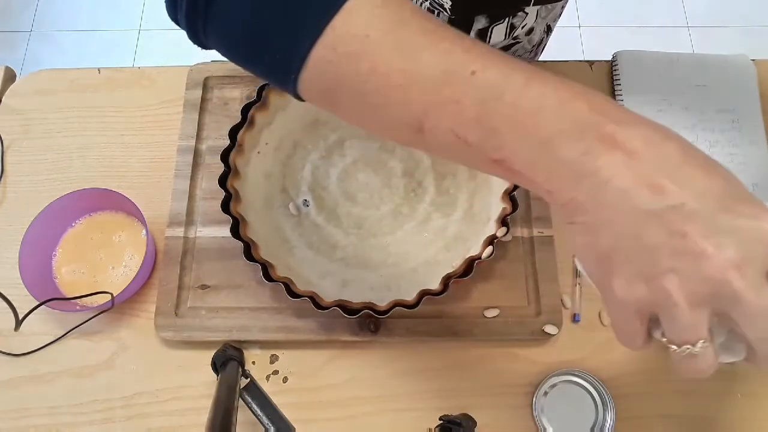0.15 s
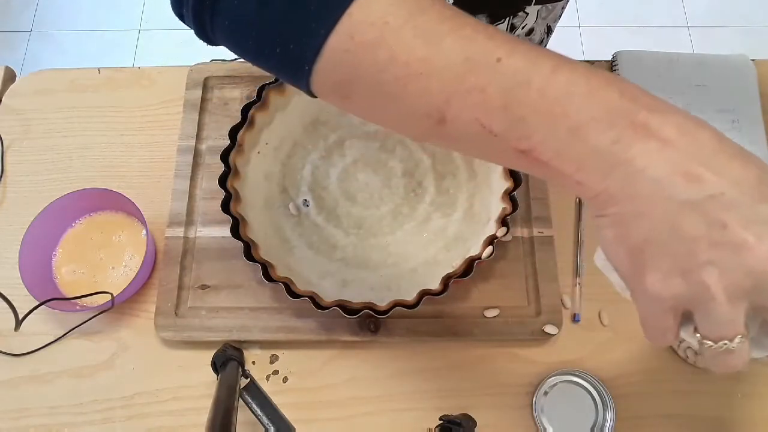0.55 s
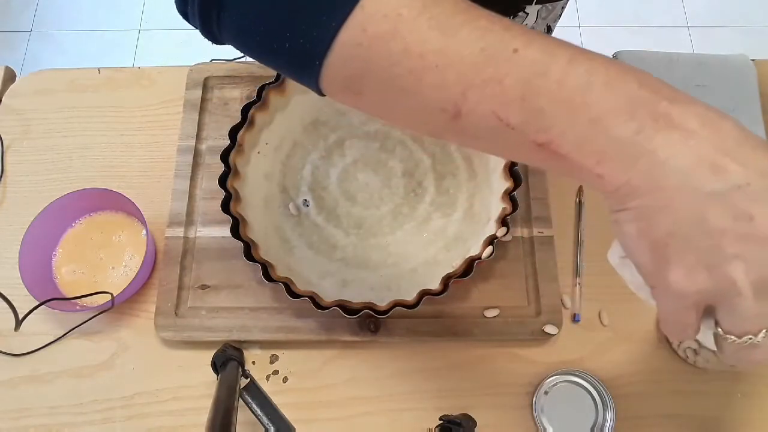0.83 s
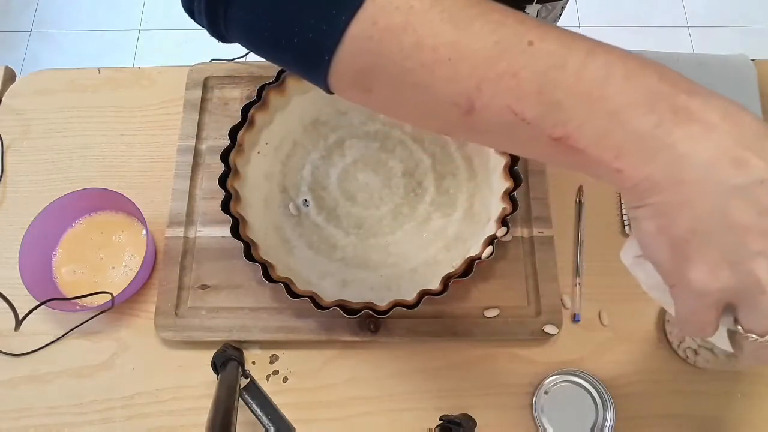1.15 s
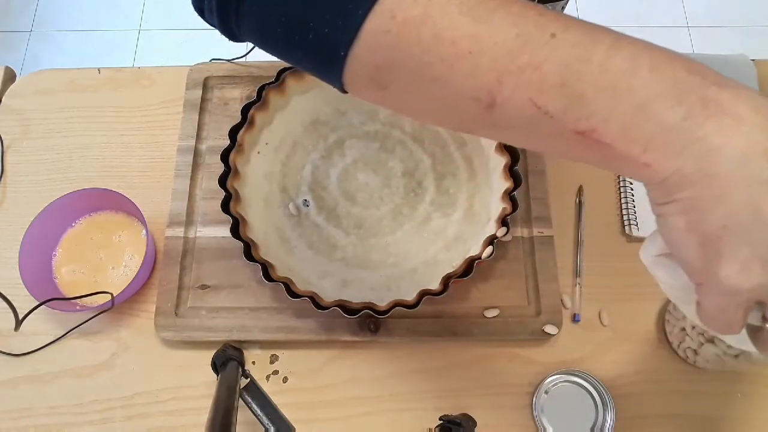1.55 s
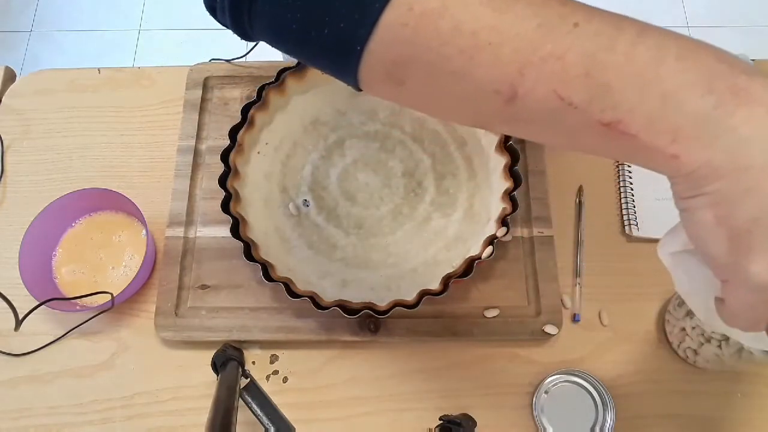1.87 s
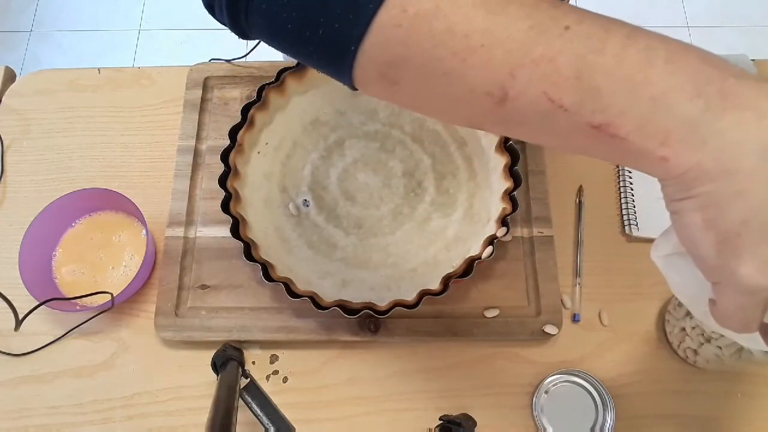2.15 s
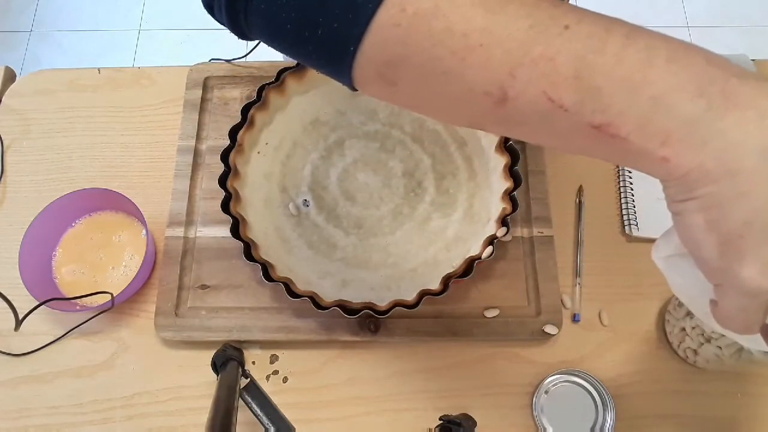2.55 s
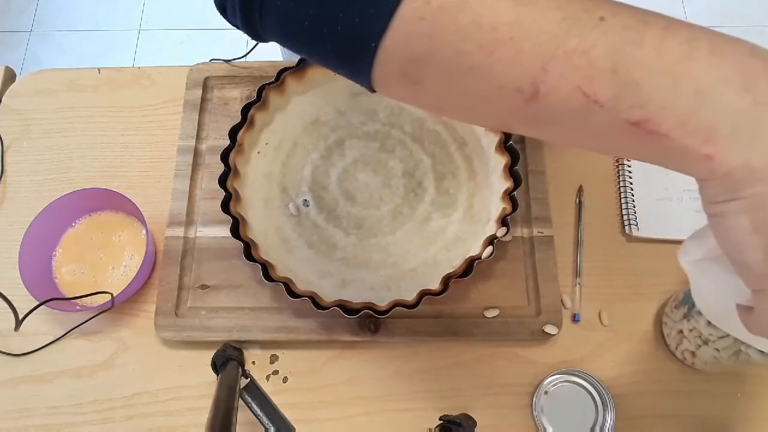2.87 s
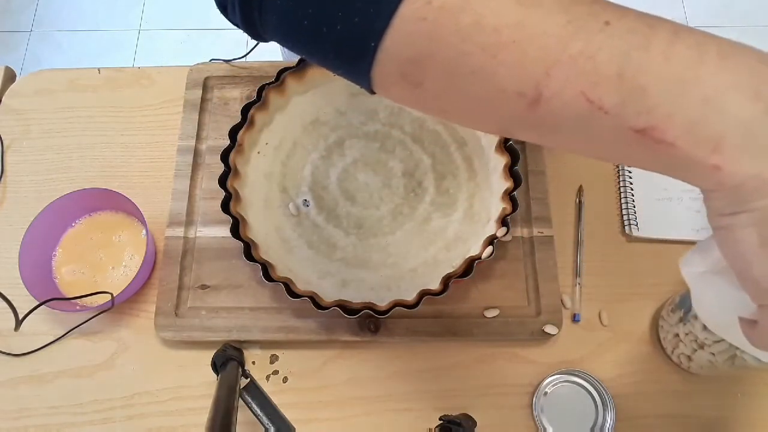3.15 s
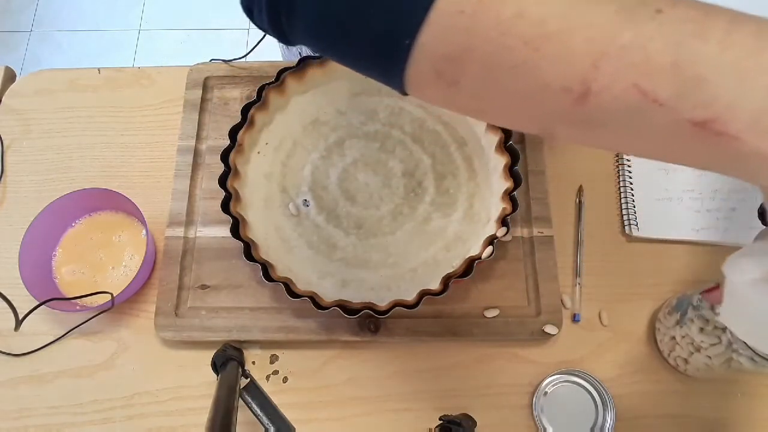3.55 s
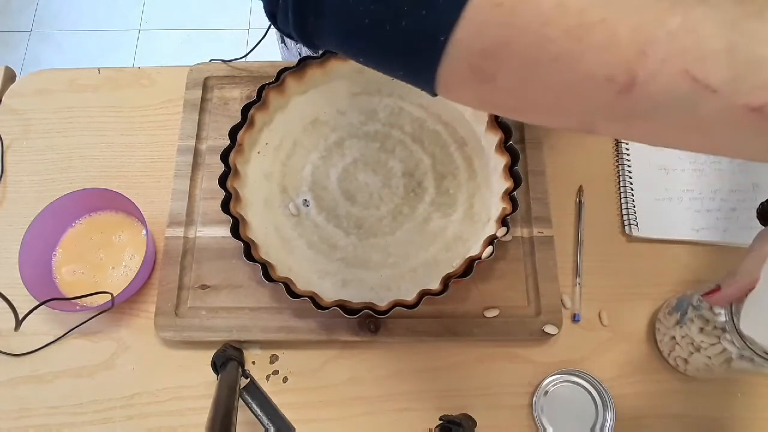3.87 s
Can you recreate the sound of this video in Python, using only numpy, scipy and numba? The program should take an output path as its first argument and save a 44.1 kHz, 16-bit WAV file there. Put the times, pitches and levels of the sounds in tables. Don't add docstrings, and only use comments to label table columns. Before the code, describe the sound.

The sound begins mid-pour: a dense stream of dried beans hits the inside of a glass jar, bright and ringing, with a hollow air boom beneath. Single beans chink clearly at about 0.2, 0.65, 1.45 and 1.7 s. The flow dips briefly near 0.5 and 1.0 s. From about 0.7 s beans clatter drily on a growing heap; the glass ring shortens and dulls while the air tone rises and strengthens. The stream thins and ends at 2.1-2.4 s. Baking paper is shaken with sharp snaps, strongest around 2.1, 2.35 and 2.55 s, sparser to 3.2 s. Dull jar-on-table knocks come from 1.7 s, notably near 2.95 and 3.85 s. A few beans tick at 3.1 and 3.3-3.45 s. From 3.5 to 4 s the paper rubs, crackles and creases. Hard kitchen walls add a short, lively reverberation over faint steady room hush; close microphone.

```python
import sys
import numpy as np
from scipy import signal
from scipy.fft import rfft, irfft, next_fast_len
from scipy.io import wavfile
from scipy.ndimage import uniform_filter1d
from numba import njit

SR = 44100
rng = np.random.default_rng(int(sys.argv[2]) if len(sys.argv) > 2 else 0)


def volts_from_db(level):
    exponent = np.asarray(level, float) / 20
    return 10 ** exponent


def to_wav(s):
    ch = np.atleast_2d(s).T
    pcm = np.round(np.clip(ch, -1, 1) * 32767)
    wavfile.write(sys.argv[1], SR, pcm.astype(np.int16))


N = 176796
T = np.arange(N) / SR


def rms_one(x):
    return x / np.sqrt(np.mean(x ** 2) + 1e-20)


def in_time(rows):
    s, *columns = np.transpose(rows)
    times = [s[0] - .05, *s, s[-1] + .05]
    return [np.interp(T, times, [-90, *c, -90]) for c in columns]


def at_hz(points, hz):
    points = np.array(points)
    return np.interp(np.log(hz), np.log(points[:, 0]), points[:, 1])


def colour(x, spectrum):
    log_gain = np.log(volts_from_db(at_hz(spectrum, np.linspace(1, SR / 2, 4097))))
    folded = irfft(log_gain) * np.r_[1, np.full(4095, 2.), 1, np.zeros(4095)]
    impulse = irfft(np.exp(rfft(folded)))
    return rms_one(signal.fftconvolve(x, impulse)[:N])


def band(x, low_hz, high_hz):
    return signal.sosfilt(signal.butter(2, [low_hz, high_hz], "band", fs=SR, output="sos"), x)


def grains(per_s, spread_db, clump_db):
    drift = uniform_filter1d(rng.standard_normal(N), size=500)
    clumps = rms_one(uniform_filter1d(drift, size=500))
    sizes = volts_from_db(spread_db * np.minimum(rng.exponential(1, N), 4)) * rng.choice([-1, 1], N)
    return sizes * (rng.random(N) < per_s * volts_from_db(clump_db * clumps) / SR)


@njit
def ring(clicks, pole, turn):
    out = np.zeros(len(clicks))
    for i in range(2, len(clicks)):
        fed_back = pole[i] * (2 * np.cos(turn[i]) * out[i - 1] - pole[i] * out[i - 2])
        out[i] = np.sin(turn[i]) * clicks[i] + fed_back
    return out


def mode(clicks, hz, width_hz):
    out, end = np.zeros(N), 110000
    struck = clicks[:end] * rng.standard_normal(end) + 1e-18
    pole = np.exp(-np.pi * (width_hz + out)[:end] / SR)
    turn = 2 * np.pi * (hz + out)[:end] / SR
    out[:end] = ring(struck, pole, turn)
    return out


def glass_wall(beans):
    # mode in Hz, width in Hz, level in dB, pitch rise when buried (0-1), time the heap buries it in seconds
    wall_modes = [(1900, 70, -15, .01, 1.8), (2570, 22, -5, .001, 1.9), (6150, 90, -17, .02, 1.2),
                  (4230, 90, -11, .01, 1.2), (4298, 32, -1.5, .028, 1.4), (4342, 38, -2.5, .04, 1.3),
                  (5612, 55, -7, .02, 1.2), (5760, 45, 1, .024, 1.35), (5830, 120, -10, .035, 1.2),
                  (7970, 50, -11, .003, 2.1), (8045, 40, -8, .001, 2.15), (8100, 40, -8, .001, 2.15),
                  (9150, 40, -13, .012, 1.5), (9228, 30, -4, .014, 1.7), (9495, 60, -8, .008, 1.8),
                  (9925, 35, -15, .008, 1.6)]
    # mode in Hz, width in Hz, level in dB
    high_modes = [(10750, 120, -22), (11100, 50, -17), (11500, 55, -13), (11930, 70, -16), (12200, 40, -21),
                  (13100, 50, -21), (13400, 80, -26), (13750, 70, -28), (14300, 150, -30), (14700, 70, -30),
                  (15200, 120, -31)]
    high_rise, high_buried_s = .006, 1.5
    out = np.zeros((2, N))
    rows = list(wall_modes) + [(*row, high_rise, high_buried_s) for row in high_modes]
    for hz, width_hz, level_db, rise, buried_s in rows:
        damping = 1 + (T / buried_s) ** 5
        pitch_hz = hz * (1 + rise * np.minimum(T / buried_s, 1.2) ** 3)
        ringing = mode(beans / damping ** .3, pitch_hz, width_hz * np.minimum(damping, 12))
        out[int(hz > 7000)] += volts_from_db(level_db) * np.sqrt(width_hz) * ringing
    return out / np.std(out[:, T < 1], axis=1, keepdims=True)


def glass_ticks(tumble):
    # frequency in Hz, level in dB per Hz
    tick_spectrum = [(700, -38.5), (1200, -13.5), (2200, -16), (3200, -20.5), (4300, -15), (5800, -7.5),
                     (7100, -17), (9500, -10), (12500, -21), (15500, -20), (16500, -33)]
    return colour(tumble * rng.standard_normal(N), tick_spectrum)


def jar_air(beans, fill):
    # mode in Hz, width in Hz, level in dB, pitch rise when full (0-1)
    air_modes = [(190, 69, -26.5, .01), (379, 25, -5.5, 0), (470, 47.5, 4, .04), (598, 123, -2, 0.12),
                 (790, 220, -3, 0.22), (1165, 180, -5.5, 0)]
    air = np.zeros(N)
    for hz, width_hz, level_db, rise in air_modes:
        ringing = mode(beans, hz * (1 + rise * fill), width_hz * (1 + 2.0 * fill ** 6))
        air += volts_from_db(level_db) * np.sqrt(width_hz) * ringing
    return rms_one(band(air, 226, 3400))


def heap_clatter(tumble):
    # frequency in Hz, level in dB per Hz
    clatter_spectrum = [(35, -77), (60, -17), (334, -16), (475, 0), (2190, -11), (2580, -11), (3110, -15),
                        (4030, -11), (7960, -14.5), (15400, -32), (16500, -56)]
    landings = rms_one(tumble * rng.standard_normal(N))
    shifting = rms_one(grains(5000.0, spread_db=7.5, clump_db=-0.5))
    return colour(landings + 0.52 * shifting, clatter_spectrum)


def pour():
    # time in seconds, flow in dB, aim at the glass wall in dB
    stream = [(0.0, 5, -2), (0.05, 1, -1), (0.09, 1, 0), (0.32, 1, 0), (0.47, -3, 0), (0.5, -6, 0),
              (0.6, -2, 0), (0.64, 1, -1), (0.92, 1, 0), (1.0, -4, -2), (1.04, -1, 2), (1.36, 0, 2),
              (1.44, -1, -5), (1.66, 1, 0), (1.77, -1, -4), (1.96, 2, -10), (2.08, -1, 0), (2.34, -18, -9)]
    full_s, heap_forms_s, heap_spread_s = 2.17, 0.67, 0.15
    flow_db, aim_db = in_time(stream)
    beans = grains(1500.0, spread_db=3.0, clump_db=1.5)
    tumble = np.sqrt(np.abs(signal.lfilter([1], [1, -.975], beans ** 2)))
    fill = np.minimum(T / full_s, 1)

    upper_db = -27 + flow_db + aim_db - 1.0 * fill ** 3
    lower_db = -24.4 + flow_db + aim_db - 6 * fill ** 3
    air_db = -32.8 + flow_db + 8.3 * fill
    heap_db = -36.5 + 8 + 0.6 * flow_db - .2 * aim_db
    stops = np.clip((stream[-1][0] + .05 - T) / .05, 0, 1)
    heap = stops / (1 + np.exp((heap_forms_s - T) / heap_spread_s))

    lower, upper = glass_wall(beans)
    glass = volts_from_db(lower_db - 0.05) * lower + volts_from_db(upper_db - 1.5) * upper
    ticks = volts_from_db(upper_db - 4.5) * glass_ticks(tumble)
    air = volts_from_db(air_db - 2.5) * jar_air(beans, fill)
    return glass + ticks + air + volts_from_db(heap_db) * heap * heap_clatter(tumble)


def kitchen(x):
    # frequency in Hz, reverberation time t60 in seconds
    decay = [(200, 0.87), (700, 0.42), (1500, 0.66), (4000, 0.68), (8000, 0.43), (11000, 0.36),
             (15000, 0.44)]
    t, edges, tail = T[:SR], 100 * 2 ** np.arange(0, 7.6, .5), 0
    white = rng.standard_normal((2, SR))
    for k, (low, high) in enumerate(zip(edges, edges[1:])):
        t60 = at_hz(decay, np.sqrt(low * high))
        tail = tail + band(white[k % 2], low, high) * volts_from_db(-60 * t / t60)
    tail = tail * np.clip((t - .003) / 0.0055, 0, 1)
    return signal.fftconvolve(x, tail / np.sqrt(np.sum(tail ** 2)))[:N]


def hush():
    # frequency in Hz, level in dB per Hz
    hush_spectrum = [(20, -12), (120, -10.5), (330, -4.5), (600, -8), (900, -7), (1900, -6), (3200, -13),
                     (8200, -17), (15600, -32)]
    return volts_from_db(-40 - 7) * colour(rng.standard_normal(N), hush_spectrum)


def chinks():
    # start in seconds, peak in dB, tone in Hz, width in Hz
    clear_beans = [
        (0.211, -25, 2570, 5.6),
        (0.346, -32, 2570, 20),
        (0.619, -21, 2580, 8),
        (0.664, -18, 7960, 60),
        (1.455, -13.5, 8050, 70),
        (1.456, -29, 15000, 100),
        (1.699, -14.5, 8030, 76),
        (1.726, -20.5, 8050, 55),
        (3.073, -38, 8100, 200),
        (3.112, -34.5, 8050, 75),
    ]
    # start in seconds, peak in dB, tone in Hz
    settling = [
        (3.304, -37, 8300),
        (3.314, -38, 8000),
        (3.323, -35, 8500),
        (3.328, -35, 7700),
        (3.36, -34, 7800),
        (3.373, -35, 8600),
        (3.388, -32, 8200),
        (3.444, -31, 8040),
    ]
    settling_width_hz = 270
    out, age = np.zeros(N + 8000), np.arange(8000) / SR
    rows = list(clear_beans) + [(*row, settling_width_hz) for row in settling]
    for s, peak_db, hz, width_hz in rows:
        tone = np.sin(2 * np.pi * hz * age) * np.exp(-np.pi * width_hz * age)
        burst = rng.standard_normal(8000) * np.exp(-age / 0.0011)
        tick = band(burst, 0.79 * hz, min(1.6 * hz, 16000))
        out[round(s * SR):][:8000] += volts_from_db(peak_db) * (tone + .3 * tick)
    return out[:N]


def knocks():
    # start in seconds, peak in dB, jar tone in Hz, jar minus table in dB
    bumps = [(1.668, -21, 520, 12), (1.965, -19, 620, 13), (2.169, -26, 727, 7), (2.189, -26, 640, 12),
             (2.279, -25, 823, 15), (2.432, -33, 853, 16), (2.441, -33, 580, 17.5), (2.918, -24, 620, 14),
             (2.956, -19, 750, 3), (3.012, -34, 850, 14), (3.029, -30, 664, 5), (3.138, -38, 713, 19),
             (3.214, -26, 900, 6), (3.466, -36, 800, 14), (3.592, -30, 770, 7), (3.646, -34, 1100, 21),
             (3.807, -33, 720, 13), (3.83, -27, 700, 9), (3.85, -20, 870, 4), (3.873, -32, 900, -2),
             (3.951, -30, 851, 15.5), (3.972, -31, 820, 13)]
    table_hz = 345
    out, age = np.zeros(N + 8000), np.arange(8000) / SR
    turn = 2 * np.pi * age
    table = np.sin(turn * table_hz) + 0.36 * np.sin(0.514 * turn * table_hz)
    push = 1 - np.exp(-age / 0.0023)
    for s, peak_db, jar_hz, jar_db in bumps:
        t60 = 0.052 - 0.0009 * jar_db
        jar = np.sin(turn * jar_hz) + .4 * np.sin(1.41 * turn * jar_hz)
        jar = volts_from_db(jar_db - 40 * age / t60) * jar
        out[round(s * SR):][:8000] += volts_from_db(peak_db - 1.0 - 60 * age / t60) * push * (table + jar)
    return out[:N]


def snap_rows():
    # start in seconds, peak in dB, low part in dB, top part in dB
    shaken = [(2.0248, -13, 5, -18), (2.0867, -3, -12, -25), (2.1274, -13.5, 0, -25),
              (2.2254, -16.5, -21, -28), (2.2802, -27, 10.5, -22), (2.2944, -20, -19, -13),
              (2.357, -6, -7.5, -22), (2.3728, -18, -16, -30), (2.4394, -27, 12.5, -34),
              (2.5322, -9.5, -14, -16), (2.5371, 0, -8.5, -20), (2.5447, -19, -17, -33.5),
              (2.5524, -13, -6, -14), (2.6918, -14, -5, -21), (2.7024, -18, -11, -26),
              (2.8005, -15.5, -8, -49.5), (2.8054, -20, -32, -8), (2.8235, -9, -10, -18),
              (2.8385, -16, -30, -33), (2.9194, -23, 2, -22), (2.9517, -24, -23, -25),
              (3.023, -11.5, -2, -24), (3.1986, -24, -8, -14), (3.2154, -36, 8, -21)]
    # start in seconds, peak in dB, centre in Hz
    creases = [(3.4351, -32, 7900), (3.4734, -39, 5030), (3.5054, -43, 8160), (3.5164, -26, 9000),
               (3.5259, -26.5, 8200), (3.5673, -23.5, 4100), (3.5932, -15, 6700), (3.6464, -26, 6100),
               (3.7035, -24, 4470), (3.7194, -21, 3650), (3.7464, -18, 8500), (3.7788, -19.5, 6400),
               (3.7928, -15.5, 6240), (3.8511, -19, 5770), (3.8751, -20, 7150), (3.931, -18.5, 8200),
               (3.9524, -14, 5700), (3.9729, -17, 3800)]
    snap_hz, crease_ms, crease_low_db = 4600, 2.4, -3
    rows = []
    for s, db, low_db, top_db in shaken:
        rows.append((s, db, low_db, top_db, 3.1 + 0.05 * db, snap_hz))
    for s, db, hz in creases:
        top_db = -21 + 7 * np.log2(hz / snap_hz)
        rows.append((s, db, crease_low_db, top_db, crease_ms, hz))
    return rows


def snaps():
    out, t = np.zeros((2, N + 2000)), np.arange(2000) / SR
    for s, peak_db, low_db, top_db, length_ms, hz in snap_rows():
        bursts = rng.standard_normal((3, 2000)) * np.exp(-(t * 1000 / max(length_ms, .3) / 1.4) ** 3)
        click = (t == 0) * np.sqrt(np.mean(np.sum(bursts ** 2, axis=1)))
        middle, body, top = [np.array([burst, click]) for burst in bursts]
        middle = band(middle, hz / 1.21, hz * 1.28) + 2.3 * band(middle, hz / 3.0, min(1.95 * hz, 11000))
        middle = band(middle, 500, 10500)
        body = -band(band(body, 600, 1450), 450, 3000)
        top = band(top, 9500, 18000)
        middle, body, top = [part / np.sqrt(np.sum(part[1] ** 2)) for part in (middle, body, top)]
        scale = volts_from_db(peak_db - 9.5) * np.sqrt(length_ms * SR / 1000)
        out[:, round(s * SR):][:, :2000] += scale * (middle + volts_from_db(low_db) * body + volts_from_db(top_db) * top)
    return out[:, :N]


def rustle():
    # time in seconds, level in dB
    rubbing = [
        (2.3, -37),
        (2.514, -45),
        (2.646, -41),
        (3.05, -42.5),
        (3.208, -42),
        (3.37, -45),
        (3.588, -40.5),
        (3.82, -33),
        (4.009, -43),
    ]
    # time in seconds, crackle in dB
    crackling = [
        (3.15, -61),
        (3.5, -67),
        (3.508, -51),
        (3.57, -46),
        (3.69, -56),
        (3.82, -47),
        (3.91, -60),
        (3.94, -46),
        (4.01, -70),
    ]
    # frequency in Hz, level in dB per Hz
    rub_spectrum = [(35, -60), (60, -17), (135, -14.5), (308, -7.5), (342, -6.5), (560, -4), (852, 0),
                    (1250, -5.5), (2400, -30), (4000, -45), (5200, -61), (8800, -120)]
    crackle_spectrum = [(1500, -16), (2500, -20), (4000, 2.5), (6500, 5), (9000, -4), (12000, -7),
                        (16000, -13), (17500, -32)]
    rub = colour(grains(600.0, spread_db=3.5, clump_db=4.5), rub_spectrum)
    crackle = colour(grains(3000.0, spread_db=0.5, clump_db=3.5), crackle_spectrum)
    return volts_from_db(in_time(rubbing)[0] - 3.0) * rub + volts_from_db(in_time(crackling)[0] + 5.5) * crackle


def scene():
    stream = pour() + chinks() + rustle()
    knock = knocks()
    snap, snap_to_walls = snaps()
    wet = kitchen(volts_from_db(-6.5) * stream + volts_from_db(0.3) * snap_to_walls + volts_from_db(-4.0) * knock)
    return (stream + snap + knock + wet + hush())[None]


def top_cut(x):
    return signal.sosfilt(signal.butter(12, 16820, fs=SR, output="sos"), x)


def record(dry):
    dry = dry / (1 + np.abs(dry / .92) ** 6) ** (1 / 6)
    size = next_fast_len(N)
    hz = np.arange(size // 2 + 1) * SR / size
    top = irfft(rfft(dry, size) * np.clip((hz - 15700) / 120, 0, 1), size)[:, :N]
    power = np.diff(dry, prepend=0) ** 2
    now = uniform_filter1d(power, size=128)
    before = uniform_filter1d(power, size=1023, origin=511)
    sharp = (now > volts_from_db(24) * np.roll(before, 128)) & (now > volts_from_db(-58))
    passed = uniform_filter1d(uniform_filter1d(1. * sharp, size=200), size=200)
    kept = rfft(dry - top * (1 - passed), size) * np.clip((16950 - hz) / 600, 0, 1)
    return top_cut(irfft(kept, size)[:, :N])


dry = scene()
out = record(dry)
to_wav(out)
```